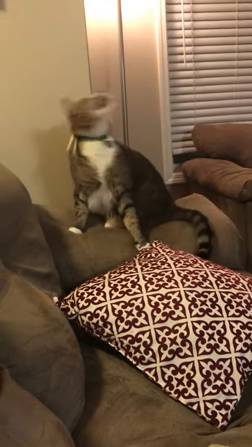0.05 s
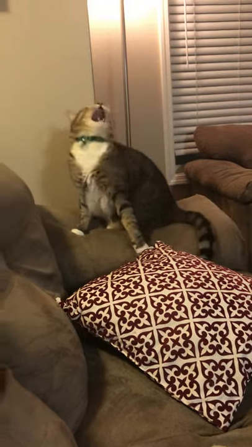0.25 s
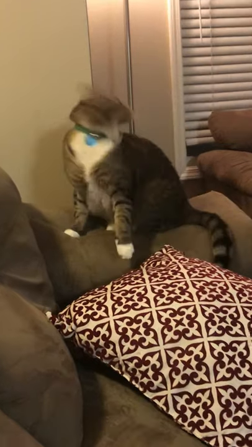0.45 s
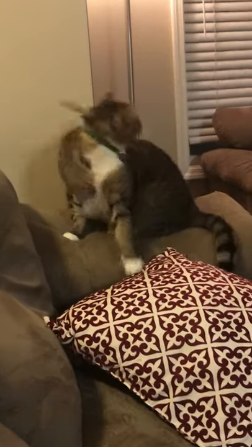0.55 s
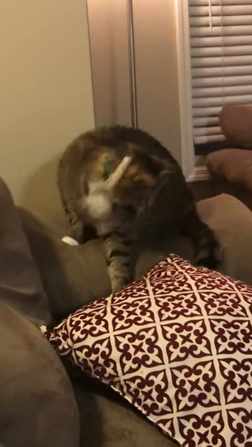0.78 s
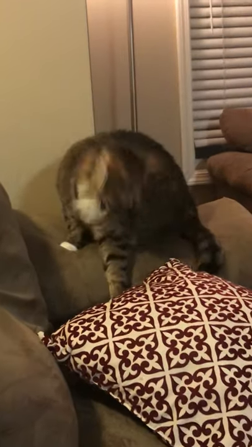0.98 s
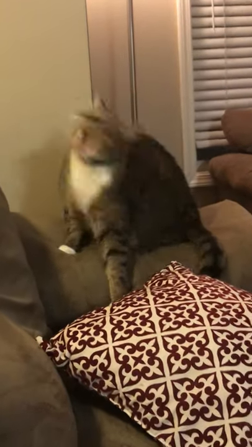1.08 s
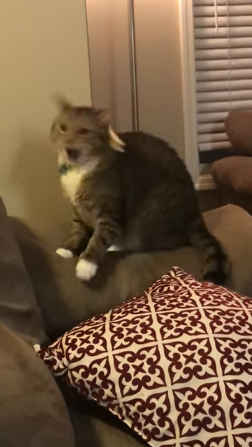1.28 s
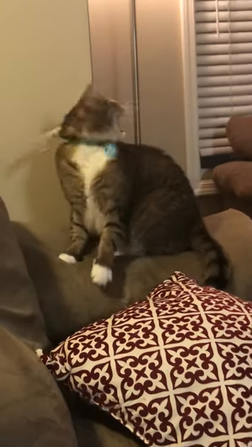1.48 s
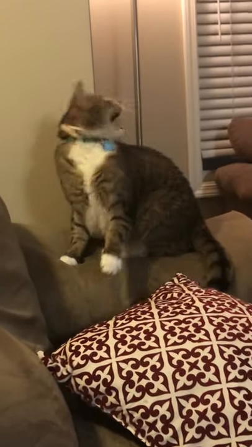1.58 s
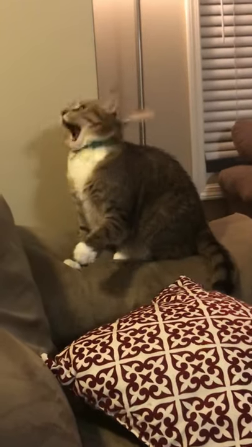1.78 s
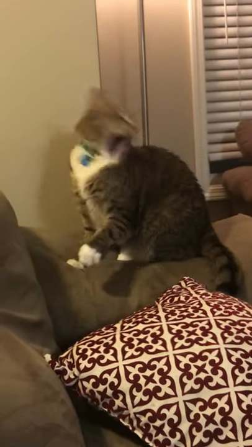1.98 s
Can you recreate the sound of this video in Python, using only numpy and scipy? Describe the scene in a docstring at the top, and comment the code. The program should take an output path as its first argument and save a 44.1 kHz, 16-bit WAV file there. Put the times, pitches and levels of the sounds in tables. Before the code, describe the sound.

A cat's small collar tag jingles, high, dry and quickly damped. Soft cushion bumps and faint rustle come around 0.1-0.2 s, then a dense flurry from 0.24 to 0.47, the sharpest clink at 0.55, more until 0.7 with a dull thud. Sparse ticks fade by 0.9; near silence until 1.1. A moderate cluster runs to 1.4, a low soft bump at 1.53, then faint tinkles from 1.6 to 2.0. Small-room reflections, low rumble, hum, slight hiss.

```python
"""In a quiet living room, a cat on a sofa shakes and tosses its head, and the metal tag on its collar jingles.
Each contact is a tiny crack plus three groups of bright modes, soon damped by fur.
Two near reflections and a diffuse tail carry the jingle on.
Soft bumps on the cushions are falling sine thuds with a pat of cloth; rustles are swells of coloured noise.
Beneath lie a low noise rumble, a faint hiss and a wavering mains hum."""
import sys
import numpy as np
from scipy import signal
from scipy.fft import rfft, irfft, next_fast_len
from scipy.io import wavfile
from scipy.ndimage import uniform_filter1d

SR = 44100
rng = np.random.default_rng(int(sys.argv[2]) if len(sys.argv) > 2 else 0)


def unload_audio(sound):
    """Save the sound as a 16-bit wav file, at the path given as the first command line argument."""
    columns = np.transpose(np.atleast_2d(sound))
    # keep every value between -1 and 1, then stretch to whole-number steps
    steps = np.round(np.clip(columns, -1, 1) * 32767)
    wavfile.write(sys.argv[1], SR, steps.astype(np.int16))


N = 90404  # length in samples

# All the spectra below set tone colour only; the layers are levelled afterwards.

# Room rumble spectrum. Each row: frequency in Hz, relative density in dB.
RUMBLE_SPECTRUM = [(20, -39), (31, -10.5), (45, -3.5), (62, -2.5), (92, -7), (125, -5.5), (182, -5.5),
                   (206, -11), (287, -2.5), (320, -8), (416, -12.5), (500, -16.5), (900, -23), (2000, -32),
                   (3500, -32.5), (4600, -45.5)]
# Hiss spectrum. Each row: frequency in Hz, relative density in dB.
HISS_SPECTRUM = [(2500, -31), (3600, 4), (6000, 5), (9000, 0.5), (15500, 0.5)]
RUMBLE_DB, HISS_DB = -60, -75  # rms
# Household hum. Each row: centre frequency in Hz, rms level in dB before it wavers.
HUM_TONES = [(60, -77), (120, -68.5), (181, -74.5), (290, -72), (413, -77.5)]
HUM_WANDER_HZ, HUM_WAVER_DB = 1.49, 2.5  # spread of the drift

# Early reflections. Each row: delay in seconds, level in dB relative to the direct sound.
REFLECTIONS = [(.0015, -15), (.00455, -12)]
ROOM_T60_S, ROOM_TREBLE_T60_S, ROOM_BUILD_S = 0.36, 0.22, 0.0017
ROOM_DB = -11  # energy of the tail relative to the direct sound

# Rustles of fur and upholstery as the cat shifts.
# Each row: middle in seconds, length in seconds, level in dB at the middle before it flutters.
RUSTLES = [(.1, .05, -70), (.19, .12, -70), (.76, .2, -72), (1.315, .03, -74)]
# Rustle spectrum. Each row: frequency in Hz, relative density in dB.
RUSTLE_SPECTRUM = [(150, -24), (600, 4.5), (1100, 0.5), (2200, -9.5), (4000, -8), (9000, -14.5),
                   (15000, -34)]
RUSTLE_FLUTTER_DB = 3.4

# Soft bumps on the sofa. Each row: start in seconds, level in dB, final pitch in Hz, t60 in seconds.
BUMPS = [(0.103, -51.5, 260, 0.028), (0.111, -62, 114, 0.028), (0.138, -46, 235, 0.027),
         (0.1708, -56, 198, 0.03), (0.7028, -44.5, 105.5, 0.14), (1.535, -54, 77, 0.29)]
BUMP_START_HZ, BUMP_FALL_S = 517, 0.0018
# Cloth pat spectrum. Each row: frequency in Hz, relative density in dB.
PAT_SPECTRUM = [(100, 2), (400, 3), (750, 1), (1200, -11), (2200, -12), (6000, -30)]
PAT_DB, PAT_T60_S = -13.5, 0.012  # level relative to the bump

# Modes of the tag: six low ones, a middle pair, a top pair.
# Each row: frequency in Hz, level in dB within its group, t60 in seconds before the ring factor.
TAG_MODES = [(5034, -2, .018), (5171, 0, 0.029), (5480, -3.5, 0.015), (5824, -1, .016), (6207, -3.5, 0.011),
             (6545, -6.5, 0.0091), (9686, -0.5, .014), (9796, -0.5, 0.02), (12200, 1, 0.014),
             (12400, -6.5, 0.0098)]
STRIKE_SPREAD_DB, DETUNE = 1.2, 0.005  # random spread per mode; detune is a fraction of its frequency
SPOT_DB_PER_HZ = 0.25  # low modes far from the favoured pitch are struck less
RADIATION_HZ = 4950  # so small a plate radiates little below this
# Contact crack spectrum. Each row: frequency in Hz, relative density in dB.
CRACK_SPECTRUM = [(200, -51), (1000, -39), (2000, -23.5), (4200, -13), (5000, -8), (6700, 3), (7500, -3),
                  (8400, 3), (9300, -1), (10400, -9.5), (11500, -1), (13300, -4.5), (15000, -6.5),
                  (16000, -7.5)]
CRACK_T60_S, CRACK_DB, MODES_DB = 0.009, 0.5, -0.5  # the levels trim every contact
SCRAPE_DB = 1.5  # energy of the scatter relative to the first snap
CONTACT_S = 0.004  # span over which a blow is levelled

# Faint chatter between the clear contacts.
# Each row: start in seconds, end in seconds, typical low-mode level in dB before the modes' trim.
CHATTER = [(0.251, .37, -53.5), (0.375, 0.483, -64.5), (.55, 0.656, -67), (1.187, 1.343, -67),
           (1.649, 1.718, -66), (1.804, 1.9, -67.5), (1.957, 2.045, -70.5)]
CHATTER_PER_S, CHATTER_SPREAD_DB, CHATTER_RING = 140, 2, 0.79
CHATTER_MIDDLE_DB, CHATTER_TOP_DB, CHATTER_CRACK_DB = -28, -14, -11  # relative to the low modes
CHATTER_LOW_HZ, CHATTER_HIGH_HZ = 4850, 5740  # range of the favoured pitch

# Clear contacts of the tag; levels stand before the trims and the high-pass on the modes.
# Each row: start in seconds, low modes in dB, middle modes in dB, top modes in dB, crack in dB,
# ring length as a factor on t60, favoured low pitch in Hz.
CONTACTS = [(0.0216, -55, -86, -82, -80, 0.82, 5600), (0.2423, -43, -73, -74, -55, 0.6, 5330),
            (0.2457, -45, -83, -80, -58, 0.68, 5530), (0.2547, -44.5, -42.5, -66, -45, 1.3, 5600),
            (0.2723, -36, -63, -63, -43.5, 0.67, 6010), (0.2783, -46, -69, -67, -62, 0.82, 5700),
            (0.2863, -55, -79, -75, -71, 0.67, 5090), (0.2969, -51, -86, -80, -69, 0.7, 5880),
            (0.3048, -42, -73, -46, -53.5, 1.2, 5400), (0.3101, -55, -85, -64, -75, 0.75, 5470),
            (0.3218, -43, -62, -52, -60, 0.96, 5470), (0.3283, -41, -73, -82, -64, 0.48, 5200),
            (0.3404, -38, -71, -44, -50.5, 1.7, 5100), (0.3574, -46.5, -84, -68, -71, 1.2, 5100),
            (0.3785, -45.5, -77, -69, -68, 0.53, 5700), (0.3853, -48.5, -70, -68, -70, 1, 5600),
            (0.3991, -43, -54, -47.5, -56, 0.96, 5550), (0.4054, -49.5, -62, -64, -54, 1.8, 5700),
            (0.4419, -50.5, -63, -49.5, -56.5, 0.67, 5410), (0.4442, -48.5, -65, -58, -78, 1.1, 5370),
            (0.4655, -66, -88, -77, -83, 0.52, 5210), (0.5144, -44, -76, -71, -52, 2.4, 5650),
            (0.5227, -50, -78, -51, -82, 0.53, 5530), (0.5451, -32.5, -38, -38.5, -32.5, 1.4, 5270),
            (0.6082, -55, -62, -58.5, -72, 0.75, 5550), (0.6175, -49, -82, -78, -71, 0.75, 5600),
            (0.6225, -53.5, -72, -89, -67, 0.65, 5900), (0.6294, -51.5, -71, -71, -68, 0.51, 5980),
            (0.6808, -42.5, -35.5, -77, -46, 0.92, 5000), (0.6865, -75, -55, -48, -46, 0.75, 5470),
            (0.7411, -57, -80, -63, -73, 0.52, 5170), (0.8377, -55.5, -87, -70, -68, 0.57, 5460),
            (0.8432, -58, -92, -84, -82, 0.75, 5510), (0.8779, -54, -58.5, -60.5, -67, 0.52, 5454),
            (1.1136, -56, -78, -75, -69, 0.66, 5530), (1.1167, -59, -80, -81, -75, 0.54, 5430),
            (1.1524, -46.5, -76, -74, -69, 0.78, 5600), (1.1814, -41, -46.5, -62, -52, 0.55, 5570),
            (1.1939, -48.5, -80, -76, -61, 0.37, 5460), (1.2532, -58, -67.5, -75, -72, 0.75, 5530),
            (1.3087, -59.5, -94, -71, -67, 0.75, 5440), (1.3192, -59, -85, -81, -69, 0.75, 5560),
            (1.3478, -41.5, -72, -58.5, -60, 0.49, 5310), (1.3671, -39, -72, -53, -64, 0.77, 5300),
            (1.4061, -41.5, -46.5, -44.5, -48.5, 0.55, 5160), (1.5005, -74, -85, -74, -69, 0.5, 5320),
            (1.6055, -62.5, -93, -79, -84, 0.81, 5460), (1.65, -52.5, -67, -78, -53.5, 1.1, 6140),
            (1.657, -60, -61, -68, -54, 1, 5430), (1.6664, -57, -65, -84, -52.5, 0.85, 5300),
            (1.6884, -55.5, -84, -64, -67, 0.75, 5290), (1.6951, -56.5, -85, -57, -77, 0.65, 5220),
            (1.7303, -55.5, -86, -82, -83, 0.31, 5395), (1.7787, -65, -95, -91, -82, 0.75, 5530),
            (1.8164, -73, -91, -92, -67, 0.75, 6187), (1.8403, -52, -85, -74, -64, 0.42, 5700),
            (1.8454, -58.5, -86, -80, -71, 0.75, 5400), (1.8667, -58, -66, -62.5, -60, 0.66, 5700),
            (1.9737, -63, -91, -75, -78, 0.67, 5300), (2.0042, -52, -63.5, -84, -73, 0.57, 5700)]
# Hard knocks of the tag on the collar's fitting. Each row: start in seconds, level in dB.
KNOCKS = [(0.272, -52), (.5452, -64), (0.6811, -48.5), (1.4067, -54)]
# Knock spectrum. Each row: frequency in Hz, relative density in dB.
KNOCK_SPECTRUM = [(100, -45), (700, -16), (1500, -8.5), (2300, -5.5), (3600, 1.5), (4500, 2.5), (7000, -9)]
KNOCK_T60_S = 0.0079

TOP_HZ = 16100  # top of the recorder's treble


def undb(db):
    """Turn dB into an amplitude factor."""
    return 10 ** (np.asarray(db) / 20)


def unit(x):
    """Scale to rms 1."""
    return x / np.sqrt(np.mean(x ** 2))


def struck(x):
    """Scale so that the first moments of a blow have rms 1."""
    return x / np.sqrt(np.mean(x[:int(CONTACT_S * SR)] ** 2))


def fade(t, t60):
    """Exponential decay of 60 dB in t60."""
    return np.exp(-np.log(1000) * t / max(t60, 1e-4))


def colour(x, points):
    """Minimum-phase filter through (Hz, dB) points, so that no sound precedes a blow."""
    size = 2 * next_fast_len(len(x))
    hz, db = np.array(points, float).T
    f = np.maximum(np.fft.rfftfreq(size, 1 / SR), 1)
    gain_db = np.interp(np.log(f), np.log(hz), db)
    cepstrum = irfft(np.log(undb(gain_db)))
    # fold the cepstrum onto positive time
    cepstrum[1:size // 2] *= 2
    cepstrum[size // 2 + 1:] = 0
    response = np.exp(rfft(cepstrum))
    return irfft(rfft(x, size) * response)[:len(x)]


def high_pass(hz):
    """Two resonant second-order high-pass sections."""
    g = np.tan(np.pi * hz / SR)
    section = np.array([1, -2, 1, 1 + g + g * g, 2 * (g * g - 1), 1 - g + g * g]) / (1 + g + g * g)
    return np.array([section, section])


def add(out, start, x):
    """Mix x into out at a time in seconds."""
    i = int(np.clip(start * SR, 0, N - 1))
    out[i:i + len(x)] += x[:N - i]


def walk(rate):
    """Random drift with rms 1: smoothed steps, rate of them a second."""
    k = int(SR / rate)
    steps = np.repeat(rng.standard_normal(N // k + 1), k)
    return unit(uniform_filter1d(steps, k)[:N])


def ring_time():
    """Time axis of one blow."""
    return np.arange(SR // 8) / SR


def background():
    """Low room rumble and faint hiss from coloured noise, and hum from sines wavering in level and pitch."""
    rumble = undb(RUMBLE_DB) * unit(colour(rng.standard_normal(N), RUMBLE_SPECTRUM))
    hiss = undb(HISS_DB) * unit(colour(rng.standard_normal(N), HISS_SPECTRUM))
    hum = np.zeros(N)
    for hz, db in HUM_TONES:
        level = undb(db + HUM_WAVER_DB * walk(7))
        pitch = hz + HUM_WANDER_HZ * walk(7.93)
        hum += level * np.sqrt(2) * np.sin(2 * np.pi * np.cumsum(pitch) / SR)
    return rumble + hiss + hum


def room(x):
    """Two near reflections and a diffuse tail whose treble dies sooner."""
    t = np.arange(SR // 2) / SR
    noise = rng.standard_normal(len(t))
    low = signal.sosfiltfilt(signal.butter(2, 8000 / (SR / 2), output="sos"), noise)
    decay = low * fade(t, ROOM_T60_S) + (noise - low) * fade(t, ROOM_TREBLE_T60_S)
    tail = decay * (1 - np.exp(-(t / ROOM_BUILD_S) ** 2))
    response = undb(ROOM_DB) * tail / np.sqrt(np.sum(tail ** 2))
    response[0] += 1  # direct sound
    for delay, db in REFLECTIONS:
        response[int(delay * SR)] += undb(db)
    return signal.fftconvolve(x, response)[:N]


def rustle():
    """Fur brushes the upholstery: coloured noise in short, uneven swells."""
    t = np.arange(N) / SR
    swell = sum(undb(db) * np.exp(-(2 * (t - middle) / length) ** 2) for middle, length, db in RUSTLES)
    flutter = undb(RUSTLE_FLUTTER_DB * walk(120))
    return swell * flutter * unit(colour(rng.standard_normal(N), RUSTLE_SPECTRUM))


def crack(points, t60):
    """A sharp snap with a very short scatter of noise, coloured by what is hit."""
    t = ring_time()[:SR // 32]
    scatter = rng.standard_normal(len(t)) * fade(t, t60)
    burst = undb(SCRAPE_DB) * scatter / np.sqrt(np.sum(scatter ** 2))
    burst[0] += 1  # the snap
    return struck(colour(burst, points))


def bumps():
    """Soft blows on upholstery: a pat of cloth and a thud whose pitch drops as the cushion gives."""
    out, t = np.zeros(N), ring_time()
    for start, db, hz, t60 in BUMPS:
        pitch = hz + (BUMP_START_HZ - hz) * np.exp(-t / BUMP_FALL_S)
        thud = fade(t, t60) * np.sin(2 * np.pi * np.cumsum(pitch) / SR)
        add(out, start, undb(db) * thud)
        add(out, start, undb(db + PAT_DB) * crack(PAT_SPECTRUM, PAT_T60_S))
    return out


def contact(low_db, middle_db, top_db, crack_db, ring, favoured_hz):
    """One contact: a crack and three groups of decaying modes, the low ones weighted by where the tag is hit."""
    t = ring_time()
    modes = []
    for hz, db, t60 in TAG_MODES:
        level = undb(db + STRIKE_SPREAD_DB * rng.standard_normal())
        pitch = hz * (1 + DETUNE * rng.standard_normal())
        modes.append(level * fade(t, t60 * ring) * np.sin(2 * np.pi * pitch * t))
    modes = np.array(modes)
    modes[1::2] *= -1  # neighbouring modes swing in opposite senses
    spot = undb(-SPOT_DB_PER_HZ * np.abs(np.array(TAG_MODES)[:6, 0] - favoured_hz))
    low, middle, top = spot @ modes[:6], modes[6:8].sum(axis=0), modes[8:].sum(axis=0)
    levels = (low_db, middle_db, top_db)
    ringing = sum(undb(db + MODES_DB) * struck(group) for db, group in zip(levels, (low, middle, top)))
    out = signal.sosfilt(high_pass(RADIATION_HZ), ringing)
    add(out, 0, undb(crack_db + CRACK_DB) * crack(CRACK_SPECTRUM, CRACK_T60_S))
    return out


def chatter():
    """The tag trembles on its ring: runs of faint contacts, unevenly spaced, each with its own pitch."""
    out = np.zeros(N)
    for start, end, level_db in CHATTER:
        count = max(int((end - start) * CHATTER_PER_S), 1)
        for k in range(count):
            db = level_db + CHATTER_SPREAD_DB * rng.standard_normal()
            when = start + (end - start) * (k + rng.random()) / count
            hz = rng.uniform(CHATTER_LOW_HZ, CHATTER_HIGH_HZ)
            blow = contact(db, db + CHATTER_MIDDLE_DB, db + CHATTER_TOP_DB, db + CHATTER_CRACK_DB,
                           CHATTER_RING, hz)
            add(out, when, blow)
    return out


def tag():
    """The clear contacts of the tag as ringing modes, with a few duller knocks of coloured noise."""
    out = np.zeros(N)
    for start, *blow in CONTACTS:
        add(out, start, contact(*blow))
    for start, db in KNOCKS:
        add(out, start, undb(db) * crack(KNOCK_SPECTRUM, KNOCK_T60_S))
    return out


def scene():
    """The jingling tag in the room, over the sofa noises and the background."""
    sofa = rustle() + bumps()
    jingle = room(tag() + chatter())
    return (background() + sofa + jingle)[None]


def record(dry):
    """The recorder cuts the top of the treble with a steep low-pass."""
    return signal.sosfilt(signal.ellip(8, 0.2, 70, TOP_HZ, fs=SR, output="sos"), dry)


dry = scene()
out = record(dry)
unload_audio(out)
```